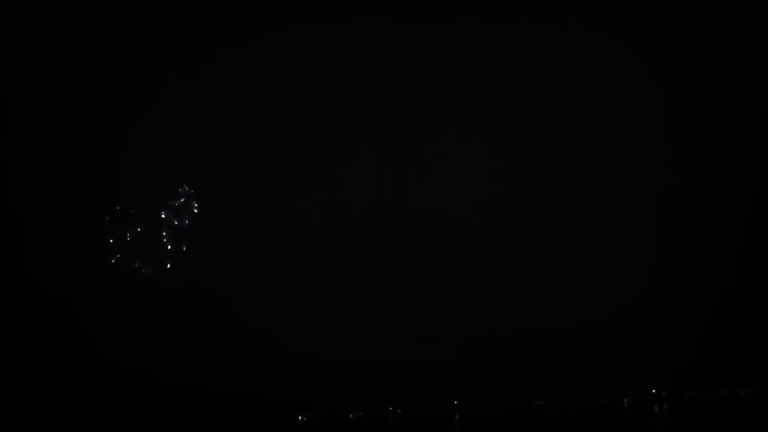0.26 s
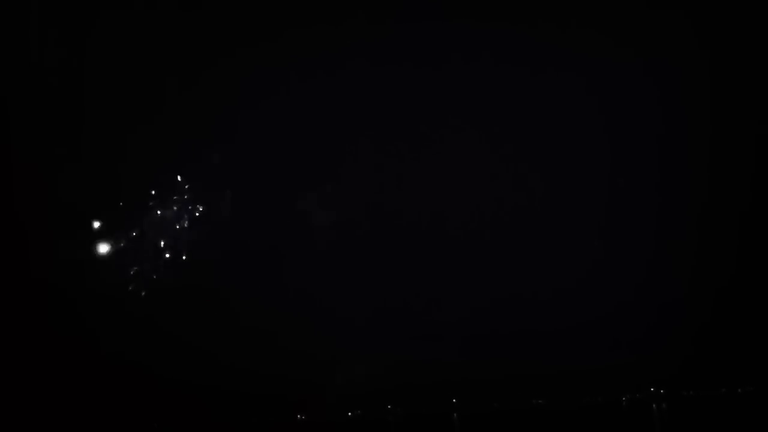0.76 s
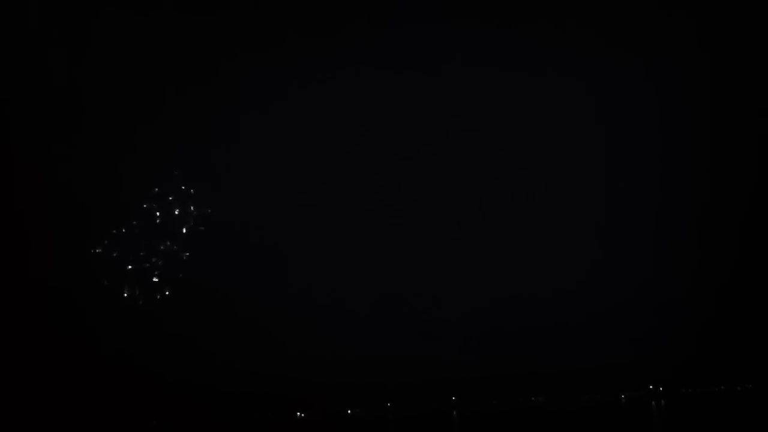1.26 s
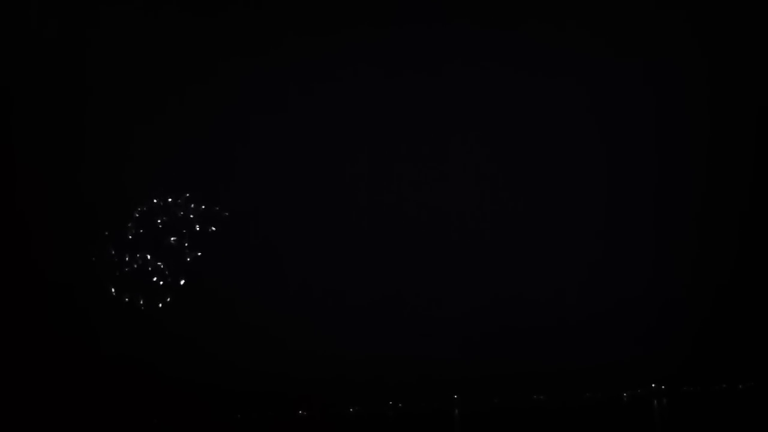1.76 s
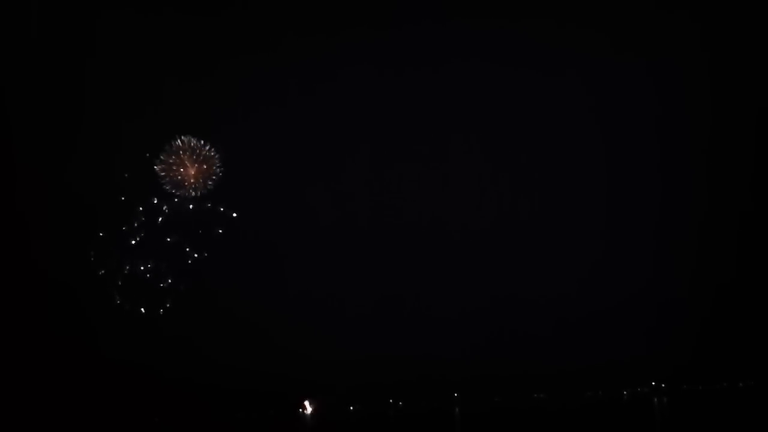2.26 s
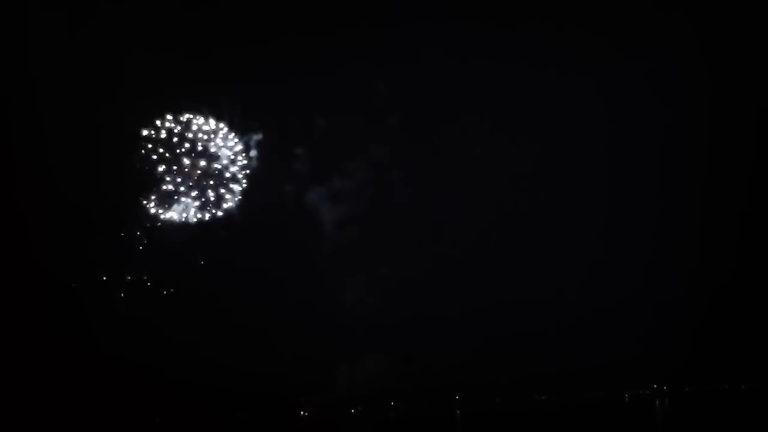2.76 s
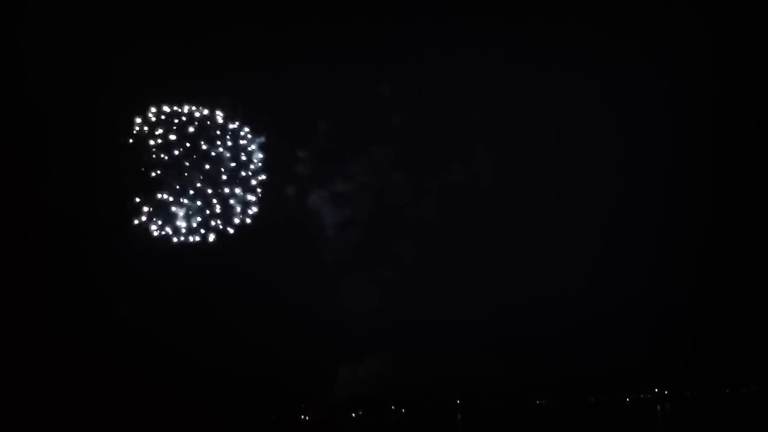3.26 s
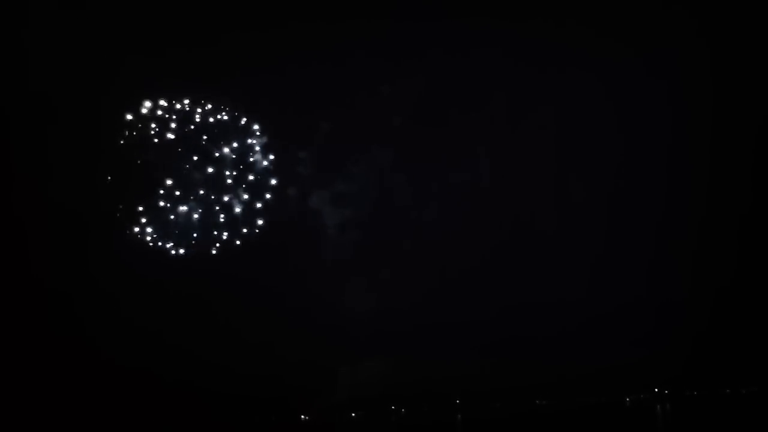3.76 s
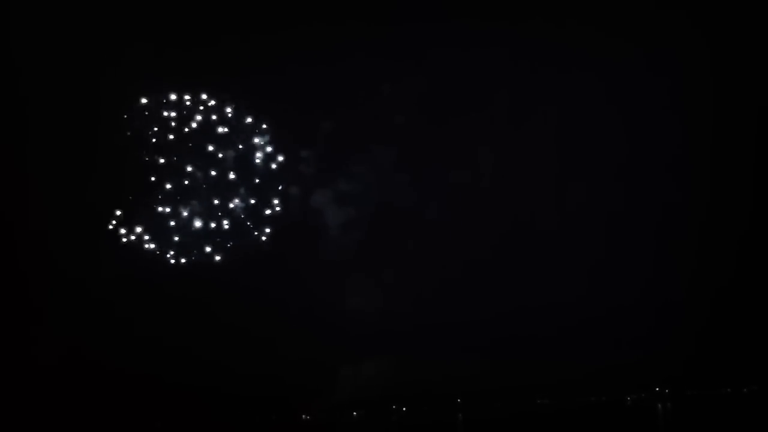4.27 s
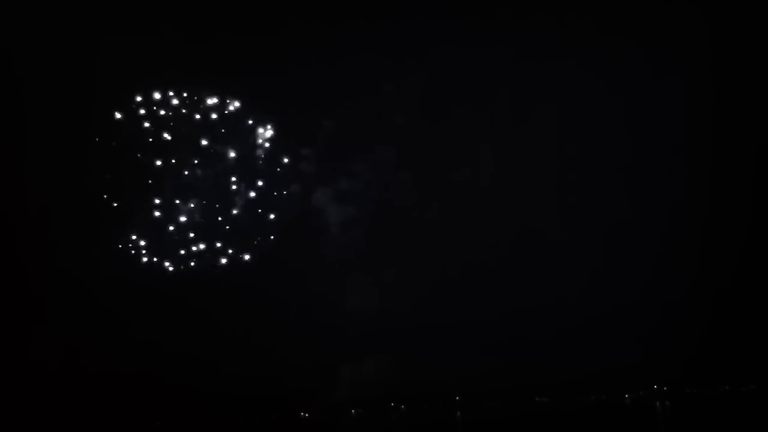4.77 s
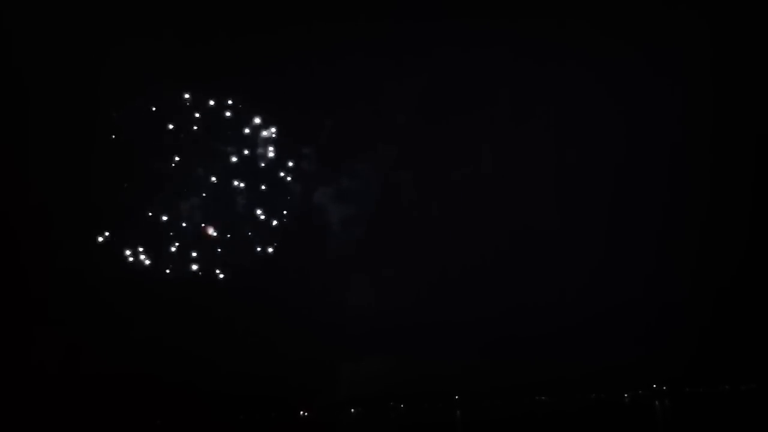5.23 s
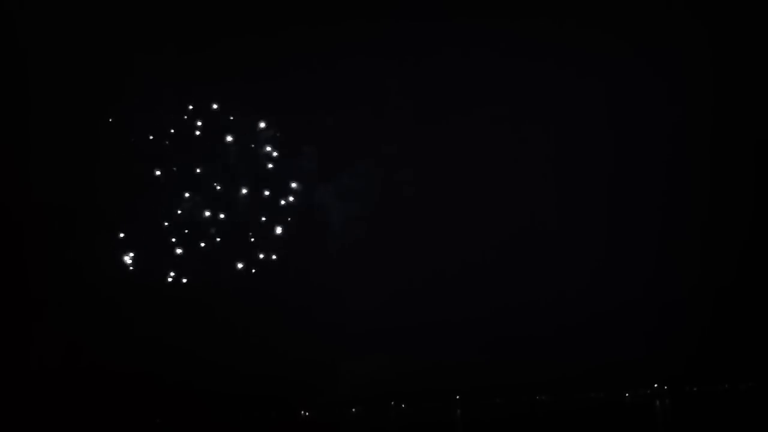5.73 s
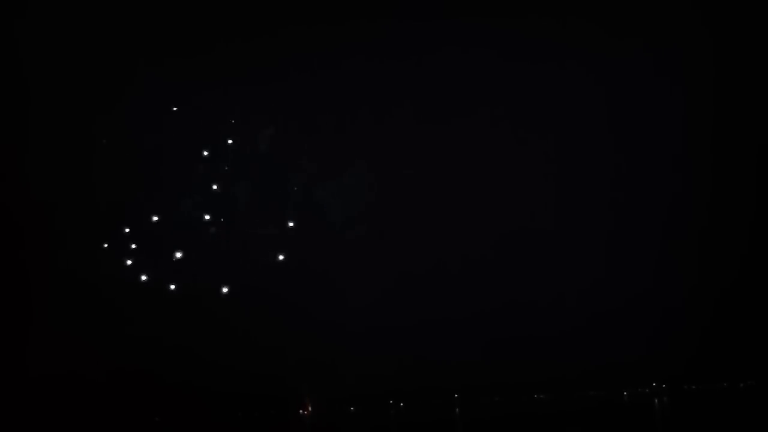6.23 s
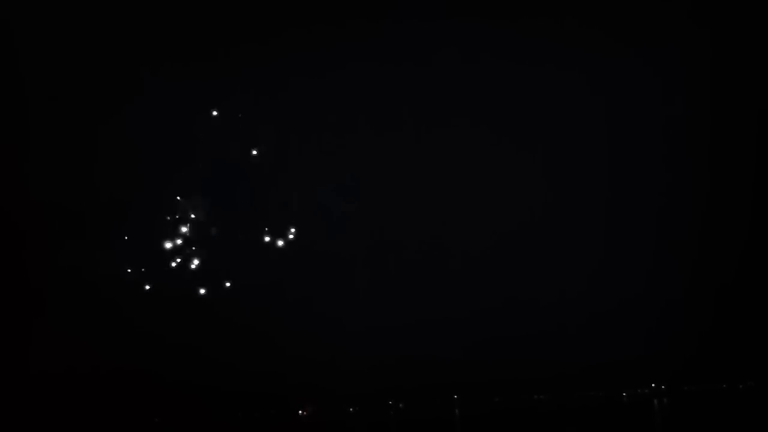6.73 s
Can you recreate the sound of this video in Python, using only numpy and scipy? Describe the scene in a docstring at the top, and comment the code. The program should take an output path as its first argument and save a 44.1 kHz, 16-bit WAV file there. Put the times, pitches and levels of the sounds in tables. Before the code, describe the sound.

Distant fireworks at night: a dull launch thump, a flurry of small cracks, then two sharp echoing bangs over a faint sizzle.

```python
"""Fireworks far across a lake at night, heard in stereo from the shore.
Mortars thump, small charges crack and shells bang: each is an N-shaped pressure wave with a ground
bounce, scattered by shore and trees. Burning stars sizzle in countless tiny pops. Beneath lie a low
outdoor rumble, a faint whine, light gusts on the microphones and a faint rustle close by."""
import sys
import numpy as np
from scipy import signal
from scipy.fft import rfft, irfft
from scipy.io import wavfile
from scipy.ndimage import uniform_filter1d

SR = 44100
rng = np.random.default_rng(int(sys.argv[2]) if len(sys.argv) > 2 else 0)


def generate_wav(signal):
    """Clip the signal to [-1, 1] and save it as 16-bit WAV at the path in sys.argv[1]."""
    frames = np.transpose(np.atleast_2d(signal))
    scaled = np.clip(frames, -1, 1) * 32767
    pcm = np.round(scaled).astype(np.int16)
    wavfile.write(sys.argv[1], SR, pcm)


N = 308635


def undb(db):
    """Decibels to gain."""
    return 10 ** (np.asarray(db) / 20)


def unit(x):
    """Scale to rms 1."""
    return x / np.sqrt(np.mean(x ** 2))


def colour(x, spectrum):
    """Shape x by rows of f/Hz, level/dB."""
    hz, db = np.transpose(spectrum)
    bins_hz = np.maximum(np.fft.rfftfreq(x.shape[-1], 1 / SR), 1)
    gain = undb(np.interp(np.log(bins_hz), np.log(hz), db))
    return irfft(rfft(x) * gain, x.shape[-1])


def cut(x, hz, kind="low", order=2):
    """Causal low-pass or high-pass."""
    return signal.sosfilt(signal.butter(order, min(hz, SR / 2 - 1000), kind, fs=SR, output="sos"), x)


def band(x, hz, width_hz):
    """One resonance, gain 1 at its centre."""
    return signal.lfilter(*signal.iirpeak(hz, hz / width_hz, fs=SR), x)


def pan(left_db):
    """Left and right gains for a level difference."""
    return undb(np.array([[left_db], [-left_db]]) / 2)


def spread(pair, side_db):
    """Two unrelated signals as mid and side of a stereo sound, rms 1."""
    return unit(pair[0] + undb(side_db) * pair[1] * np.array([[1], [-1]]))


def walk(steps_per_s):
    """Slow random wander, spread near 1."""
    hold = int(SR / steps_per_s)
    steps = np.repeat(rng.standard_normal(N // hold + 1), hold)
    return 1.48 * uniform_filter1d(steps, hold)[:N]


def grains(per_s, spread_db):
    """Two unrelated streams of tiny clicks of uneven size."""
    hits = rng.random((2, N)) < per_s / SR
    return hits * rng.standard_normal((2, N)) * undb(spread_db * rng.standard_normal((2, N)))


def add(track, start_s, sound):
    """Mix a sound into a track."""
    i = int(start_s * SR)
    track[i:i + len(sound)] += sound[:max(N - i, 0)]


def swells(rows, rise_s, fade_db_per_s):
    """Gain from rows of t/s, length/s, level/dB: each rises, holds, fades; overlaps add in power."""
    t = np.arange(N) / SR
    gains = []
    for start_s, length_s, db in rows:
        rise = np.clip((t - start_s) / rise_s, 0, 1)
        gains.append(rise * undb(db - fade_db_per_s * np.maximum(t - start_s - length_s, 0)))
    return np.linalg.norm(gains, axis=0)


def night():
    """Distant rumble and a faint steady whine; light gusts buffet the microphones."""
    # outdoor rumble: f/Hz, level/dB
    rumble_spectrum = [(20, 4), (30, -11), (45, -7), (90, -6), (180, -11.5), (300, -18), (500, -29),
                       (950, -31.5), (1600, -44), (3000, -44.5), (5000, -48.5), (8000, -54.5), (15000, -59)]
    noise = spread(cut(rng.standard_normal((2, N)), 18, "high"), side_db=-2.5)
    rumble = unit(colour(noise, rumble_spectrum))
    air = spread(rng.standard_normal((2, N)), side_db=-6.5)
    buffet = unit(cut(cut(air, 12.9, order=3), 1.7, "high"))
    whine_hz, width_hz = 964, 14
    whine = unit(band(band(rng.standard_normal(N), whine_hz, width_hz), whine_hz, width_hz))
    rumble_db = -64 + walk(steps_per_s=5)
    gust_db = -54 + 1.44 * walk(steps_per_s=1.4)
    return rumble * undb(rumble_db) + buffet * undb(gust_db) + whine * undb(-100)


def stars():
    """Countless tiny pops of burning stars merge into a distant sizzle."""
    # star clouds that catch, burn evenly and die out: t/s, burn length/s, level/dB
    clouds = [(-1.0, 0.74, -70), (0.3, 3.02, -70.5), (3.3, 1.245, -67.8), (5.5, 0.31, -80.5)]
    # sizzle: f/Hz, level/dB
    sizzle_spectrum = [(200, -11), (400, 0.5), (850, 0), (1400, -3.5), (1900, -5), (2500, -5), (3800, -14),
                       (5000, -25.5), (7000, -41), (12000, -45)]
    pops = spread(grains(per_s=4500, spread_db=2.5), side_db=-8)
    burning = swells(clouds, rise_s=0.16, fade_db_per_s=19)
    waver_db = 0.6 * walk(steps_per_s=17)
    return unit(colour(pops, sizzle_spectrum)) * burning * undb(waver_db) * pan(3.5)


def n_wave(push_ms, suction):
    """A shock, a straight fall from 1 to -suction, then a recovery that balances the push."""
    u = np.arange(SR // 10) / SR * 1000 / push_ms
    fall = 1 - (1 + suction) * u
    recovery = -suction * np.exp(-np.maximum(u - 1, 0) * 2 * suction / (1 - suction))
    return np.where(u < 1, fall, recovery)


def shock(db, wave_ms, edge_hz, suction, soft_hz):
    """A distant N-wave: turbulence rounds the fronts, air absorbs the top."""
    rounded = cut(n_wave(wave_ms, suction), soft_hz, order=1)
    return undb(db) * cut(rounded, edge_hz, order=3)


def grounded(wave, delay_ms, gain, edge_hz):
    """The ground returns the lows a moment later; soft ground inverts the deepest (gain < 0)."""
    lag = int(delay_ms * SR / 1000)
    return wave + gain * np.pad(cut(wave, edge_hz), (lag, 0))[:len(wave)]


def echoed(x, reflections):
    """Add single low-passed reflections: rows of delay/s, gain/dB, edge/Hz."""
    out = x.copy()
    for delay_s, db, edge_hz in reflections:
        add(out, delay_s, undb(db) * cut(x, edge_hz))
    return out


def launches():
    """Mortar thumps with a short tube ring. Returns direct sound and send to the landscape."""
    # mortar shots: t/s, level/dB, wave length/ms, edge/Hz, relative ring/dB, send/dB
    shots = [(.2930, -21, 3.72, 5700, -21, -1.5), (3.8557, -23.5, 3.8, 3950, -25, -1.5)]
    # low echoes from bank and far shore: delay/s, gain/dB, edge/Hz
    bank_echoes = [(0.016, -11, 610), (.135, -22.5, 400)]
    ring_hz, ring_decay_s = 108, 0.044
    direct, sent = np.zeros(N), np.zeros(N)
    for start_s, db, wave_ms, edge_hz, ring_db, send_db in shots:
        wave = shock(db, wave_ms, edge_hz, suction=0.6, soft_hz=2490)
        t = np.arange(len(wave)) / SR
        ring = undb(db + ring_db) * np.sin(2 * np.pi * ring_hz * t) * np.exp(-t / ring_decay_s)
        dull = cut(wave, 410) + undb(-19.5) * wave  # grazed ground absorbs most of the treble
        add(direct, start_s, grounded(dull, delay_ms=4.3, gain=-0.54, edge_hz=119) + ring)
        add(sent, start_s, undb(send_db) * wave)
    return echoed(direct, bank_echoes) * pan(0.8), sent


def scatter(spectrum, t60_s, build_s, side_db, patchy_db):
    """Response of many reflectors, a few much larger than the rest: builds up, dies away unevenly."""
    t = np.arange(2 * SR) / SR
    envelope = (1 - np.exp(-t / build_s)) * np.exp(-np.log(1000) * t / t60_s)
    envelope *= undb(patchy_db * walk(steps_per_s=70)[:len(t)])
    reflectors = rng.standard_normal((2, len(t))) * undb(4.7 * rng.standard_normal((2, len(t))))
    noise = colour(spread(reflectors, side_db), spectrum)
    return noise * envelope / np.sqrt(np.sum(envelope ** 2))


def landscape(sent):
    """Uneven air splinters the treble for a few milliseconds; shore and trees scatter a longer tail."""
    # scatter from the air: f/Hz, level/dB
    air_spectrum = [(600, -36.5), (1500, -9), (4000, -5), (14000, -1)]
    # from the near shore: f/Hz, level/dB
    shore_spectrum = [(40, -7.5), (110, -11.5), (250, -12.5), (500, -6.5), (900, -5.5), (2000, -7.5),
                      (5000, -1), (14000, -2.5)]
    # from far trees: f/Hz, level/dB
    tree_spectrum = [(40, -12.5), (110, -10.5), (250, -14.5), (500, -8), (900, -12), (2000, -10),
                     (5000, -3.5), (14000, -15.5)]
    air = scatter(air_spectrum, t60_s=0.021, build_s=0.00047, side_db=-11.5, patchy_db=0.5)
    shore = scatter(shore_spectrum, t60_s=0.31, build_s=0.0035, side_db=-1, patchy_db=2)
    trees = scatter(tree_spectrum, t60_s=1.0, build_s=0.022, side_db=0, patchy_db=1)
    response = undb(-1.5) * air + undb(-2) * (shore + trees)
    return pan(3.4) * signal.fftconvolve(sent[None], response, axes=1)[:, :N]


def rustle():
    """Faint dry rustle close by: single fibres catch and snap, with a few ticks."""
    # rustles: t/s, length/s, level/dB
    stirs = [(.3, .1, -85.5), (.76, .33, -89.5), (1.5, .2, -83.5), (5.24, .18, -79), (5.58, .32, -85),
             (6.48, .3, -89)]
    # fibre noise: f/Hz, level/dB
    fibre_spectrum = [(800, -10), (1800, -1), (3500, 0), (6000, -5.5), (11500, -9.5), (13000, -16),
                      (16000, -31.5)]
    # small ticks: t/s, level/dB, f/Hz
    tick_events = [(1.003, -73, 9000), (1.077, -74, 8000), (5.303, -67, 3500), (5.324, -70, 6500),
                   (5.800, -70, 6000), (6.158, -69, 3200), (6.752, -69, 6000)]
    fibres = spread(grains(per_s=9000, spread_db=4.5), side_db=-0.5)
    snags = spread(grains(per_s=60, spread_db=2.5), side_db=0.5) * undb(-8)
    ticks, t = np.zeros(N), np.arange(SR // 20) / SR
    for start_s, db, hz in tick_events:
        snap = band(rng.standard_normal(len(t)) * np.exp(-t / 0.003), hz, width_hz=hz / 6)
        add(ticks, start_s, undb(db) * snap / np.abs(snap).max())
    stirring = swells(stirs, rise_s=0.099, fade_db_per_s=30)
    waver_db = 0.6 * walk(steps_per_s=35)
    return unit(colour(fibres + snags, fibre_spectrum)) * stirring * undb(waver_db) + ticks


def crinkled(wave, span_s, db):
    """Eddies split off six weak late copies, giving each wave its own colour."""
    out = wave.copy()
    for late, size in zip(rng.random(6), rng.uniform(-1.23, 1, 6)):
        lag = 1 + int(late * span_s * SR)
        out[lag:] += undb(db) * size * wave[:-lag]
    return out


def cracks():
    """Small charges in pairs and flurries, each bouncing at its own angle. Returns direct and send."""
    # charges: t/s, level/dB, wave length/ms
    charges = [ (1.4410, -27.5, .75), (1.4705, -30.5, 0.64), (1.7312, -27, 0.85), (1.7641, -28, 0.69),
               (2.0824, -30, 0.69), (2.1276, -27, .8), (2.2317, -27, 0.89), (2.3041, -26, 0.88),
               (2.3140, -28.7, 0.73), (2.6066, -28, 0.87), (2.6174, -25, .88), (2.7088, -28.5, .84),
               (2.7589, -27.5, .85), (2.7814, -28.5, 0.99), (2.7838, -29, .9), (2.7928, -29.5, .8),
               (2.8063, -26.5, .88), (2.8487, -27.5, .9), (2.8533, -25.5, 0.67), (2.8578, -28, 0.97),
               (2.8906, -25, .78), (3.0082, -27.5, 0.64), (3.0526, -29, .77), (3.1285, -27.5, 0.9)]
    bounces_ms = 2.0 + 0.12 * rng.standard_normal(len(charges))
    direct, sent = np.zeros(N), np.zeros(N)
    for (start_s, db, wave_ms), bounce_ms in zip(charges, bounces_ms):
        edge_hz = 3000 + 1650 * wave_ms  # bigger charges, with longer waves, keep a steeper front
        wave = shock(db, wave_ms, edge_hz, suction=0.58, soft_hz=1760)
        wave = cut(wave, 6900, order=4)
        arrival = crinkled(wave, span_s=0.0055, db=-19)
        add(direct, start_s, grounded(arrival, bounce_ms, gain=0.28, edge_hz=875))
        add(sent, start_s, undb(-0.5) * wave)
    return direct * pan(4.4), sent


def bursts():
    """Shells break high up, one sharp N-wave each. Returns direct and send."""
    # shells: t/s, level/dB, wave length/ms, edge/Hz, send/dB, bounce/ms, bounce gain, bounce edge/Hz
    shells = [(3.8842, -12.5, 2.11, 12000, 1, 4.93, -1.23, 131),
              (6.9283, -19, 1.58, 5800, 0, 2.2, 0.6, 540)]
    # sharp echo from something solid on the shore: delay/s, gain/dB, edge/Hz
    near_echo = [(0.0217, -29.5, 7100)]
    direct, sent = np.zeros(N), np.zeros(N)
    for start_s, db, wave_ms, edge_hz, send_db, bounce_ms, bounce_gain, bounce_hz in shells:
        wave = shock(db, wave_ms, edge_hz, suction=0.49, soft_hz=2880)
        add(direct, start_s, grounded(wave, bounce_ms, bounce_gain, bounce_hz))
        add(sent, start_s, undb(send_db) * wave)
    return echoed(direct, near_echo) * pan(3.3), sent


def scene():
    """Fireworks and their echoes from the left, over the sounds of the shore."""
    direct, sent = (sum(parts) for parts in zip(launches(), cracks(), bursts()))
    return direct + landscape(sent) + stars() + rustle() + night()


def record(dry):
    """The microphone housing colours the sound; a steep low-pass cuts the top."""
    # housing peaks and dips: f/Hz, width/Hz, gain/dB
    housing = [(618, 173, -3.5), (935, 290, 0), (1840, 240, 3.5), (2380, 1530, -4)]
    top_hz = 16000
    for hz, width_hz, db in housing:
        dry = dry + (undb(db) - 1) * band(dry, hz, width_hz)
    return signal.sosfilt(signal.ellip(8, 0.2, 70, top_hz, fs=SR, output="sos"), dry)


dry = scene()
out = record(dry)
generate_wav(out)
```